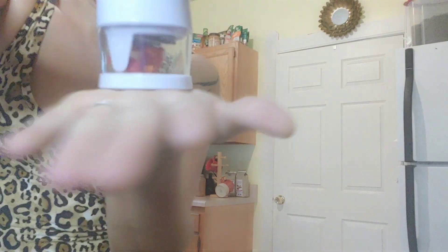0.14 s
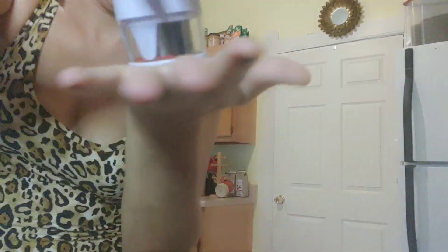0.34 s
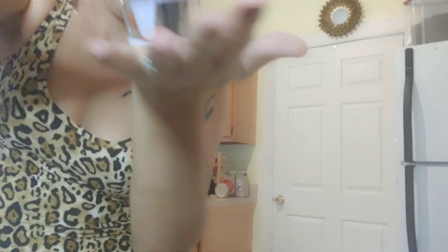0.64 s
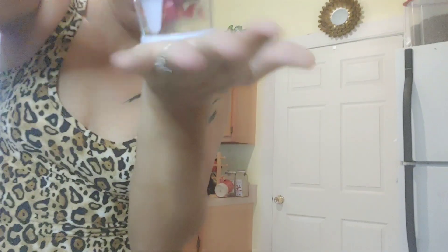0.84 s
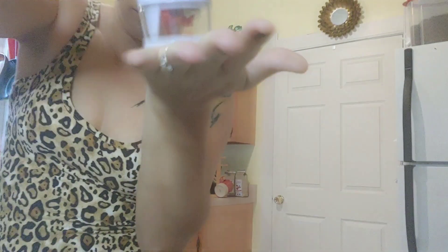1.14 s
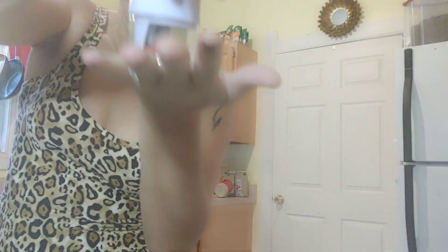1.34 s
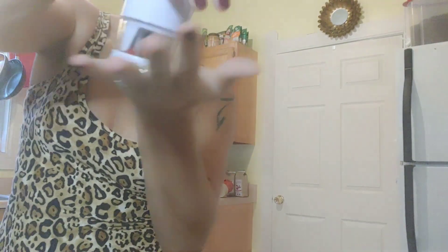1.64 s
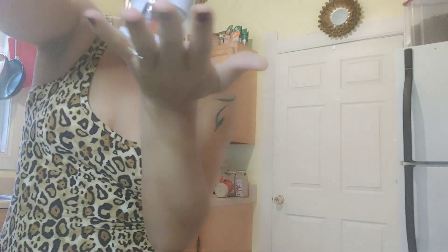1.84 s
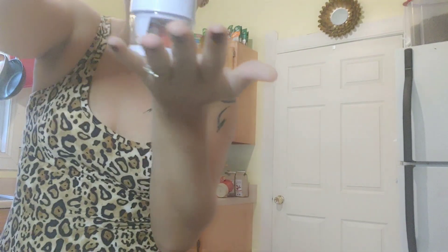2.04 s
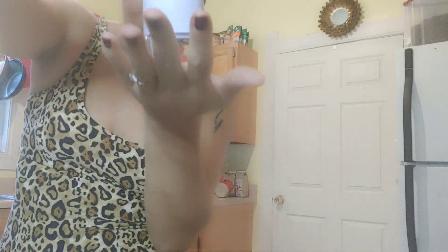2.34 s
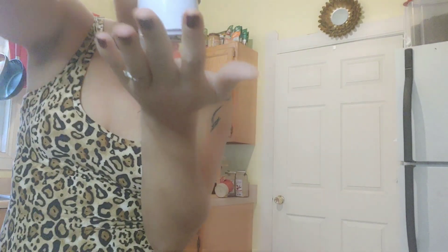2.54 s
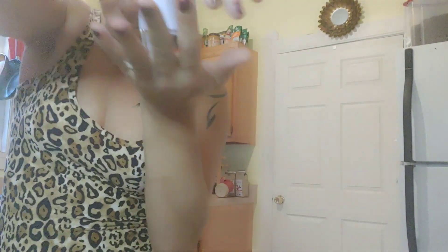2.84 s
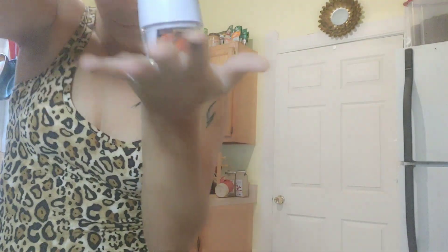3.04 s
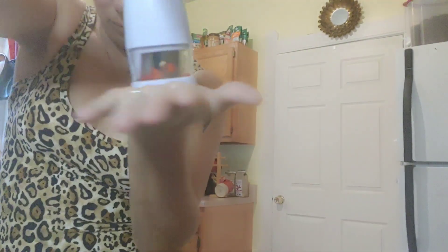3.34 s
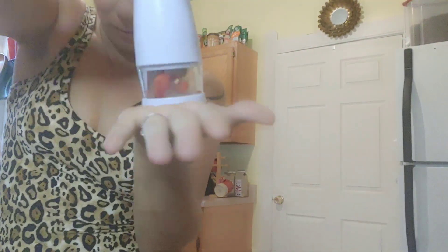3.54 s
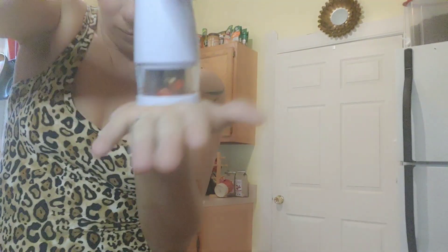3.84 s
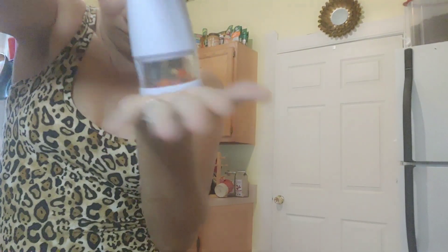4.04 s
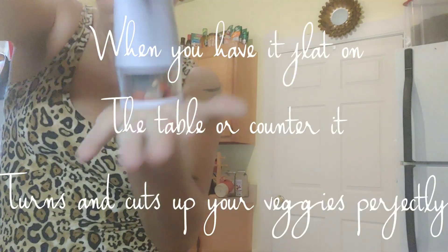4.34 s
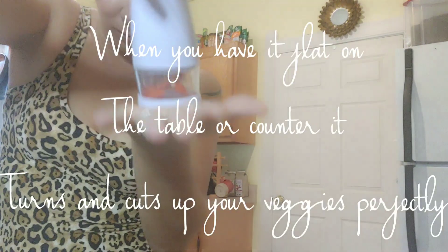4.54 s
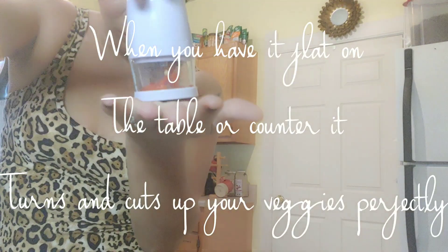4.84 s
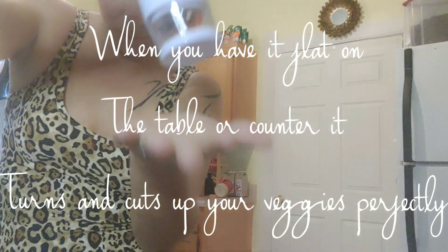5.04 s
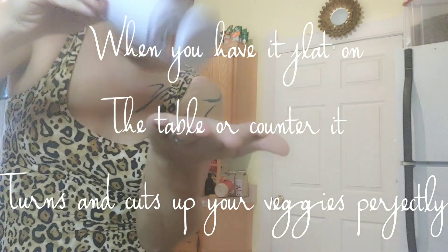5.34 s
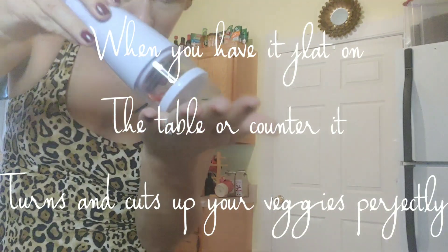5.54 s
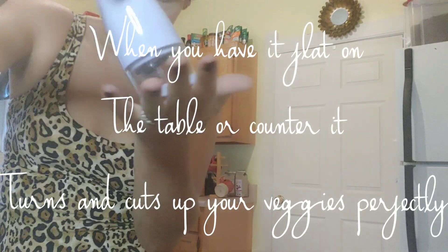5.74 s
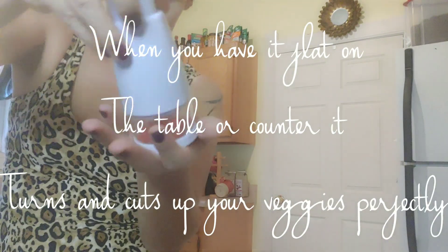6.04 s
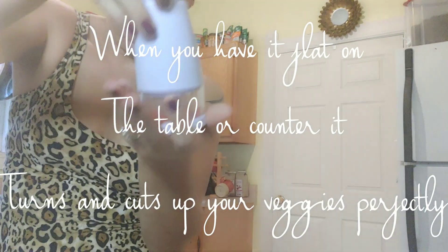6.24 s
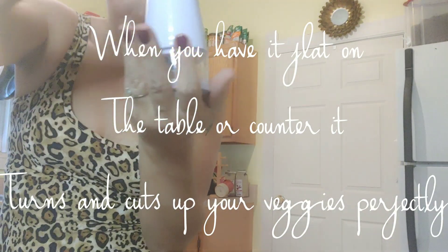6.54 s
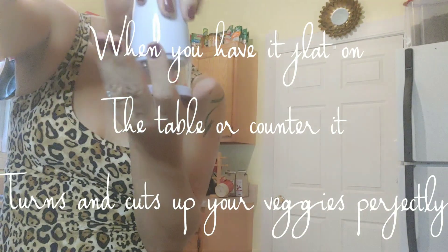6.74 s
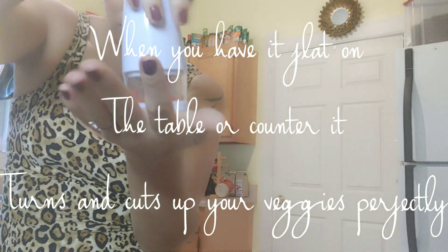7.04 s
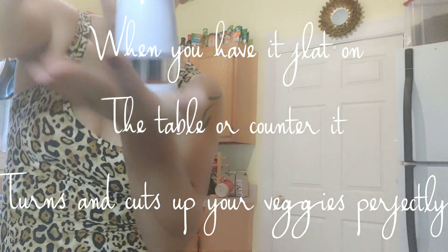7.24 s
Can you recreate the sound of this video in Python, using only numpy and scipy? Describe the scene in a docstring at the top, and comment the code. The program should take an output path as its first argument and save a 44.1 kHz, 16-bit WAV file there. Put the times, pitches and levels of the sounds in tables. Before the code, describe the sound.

Close to a stereo microphone in a lively kitchen, a spring-loaded plastic chopper is pumped on a palm. Each push rasps down with small vegetable crunches and a hollow knock; each return sings briefly and clacks with a bright metallic ping. Six pushes, a short pause, seven quicker ones, then sparse rattles, a soft hollow landing and a final spring-back over low appliance hum.

```python
"""A plastic plunger chopper works on an open palm in a kitchen, close to a stereo microphone.
The spring throws the plunger back onto its stop, then pushes scrape down the barrel and chop into the cup:
six pushes, a pause in which the spring is eased back, seven more. Light plastic rattles follow, the cup
lands on the palm, and the plunger springs back one last time. Throughout, an appliance hums and the room answers.
Contacts and rubbing are shaped noise bursts, rings are resonances, and a noise suppressor turns pauses down."""
import sys
import numpy as np
from scipy import signal
from scipy.fft import rfft, irfft, next_fast_len
from scipy.io import wavfile
from scipy.ndimage import uniform_filter1d, map_coordinates

SR = 44100
rng = np.random.default_rng(int(sys.argv[2]) if len(sys.argv) > 2 else 0)


def to_wav(s):
    """Save 16-bit WAV."""
    ch = np.atleast_2d(s).T  # columns
    pcm = np.round(np.clip(ch, -1, 1) * 32767)  # PCM
    wavfile.write(sys.argv[1], SR, pcm.astype(np.int16))


N = 325458
T = np.arange(-SR // 8, SR // 4) / SR  # time around one contact [s]
LEAD = SR // 4  # samples of action before time zero

# colour of the plunger rubbing in the barrel: (frequency [Hz], level [dB])
BARREL_COLOUR = [(100, -35), (300, -14), (700, -6), (1200, -5.5), (1600, -6), (2200, 3), (2700, -9.5),
                 (4400, -2.5), (5900, -9.5), (7100, -3.5), (8600, -18), (11600, -14.5), (13000, -24.5),
                 (15500, -41)]
# bright colour of hard plastic clacking: (frequency [Hz], level [dB])
CLACK_COLOUR = [(500, -21), (1400, -0.5), (2000, -3.5), (3000, -7.5), (4500, 0), (6000, -2), (7500, -1),
                (8800, -10.5), (12000, -10.5), (15500, -34.5)]
# dull colour of a jolt or rattle: (frequency [Hz], level [dB])
THUD_COLOUR = [(80, -19), (300, -4.5), (650, -7), (1000, -0.5), (1600, -4), (2500, -4.5), (6000, -29.5),
               (14000, -50)]


def amp(db):
    """Decibels to gain."""
    return 10 ** (np.asarray(db) / 20)


def unit(x):
    """Scale to rms 1."""
    return x / np.sqrt(np.mean(x ** 2) + 1e-20)


def blow(x, db):
    """Give a short sound the energy of 10 ms at this rms level."""
    energy = np.mean(np.sum(x ** 2, axis=-1))
    return x * amp(db) * np.sqrt(.01 * SR / (energy + 1e-20))


def along(points, hz):
    """Read (frequency [Hz], value) points on a log frequency axis."""
    f, v = np.transpose(points)
    return np.interp(np.log(hz + 1), np.log(f), v)


def filtered(x, response):
    """Apply a complex response of frequency, with padding against wrap-around."""
    m = 2 * next_fast_len(x.shape[-1] // 2 + 2048)
    spectrum = rfft(x, m) * response(np.fft.rfftfreq(m, 1 / SR))
    return irfft(spectrum, m)[..., :x.shape[-1]]


def coloured(x, points):
    """Causal filter with the given (frequency [Hz], level [dB]) shape; minimum phase by cepstrum."""
    def response(hz):
        cepstrum = irfft(np.log(amp(along(points, hz))))
        cepstrum[1:len(hz) - 1] *= 2
        cepstrum[len(hz):] = 0
        return np.exp(rfft(cepstrum))
    return filtered(x, response)


def ring(x, hz, width_hz, order=1):
    """One resonance; order 2 has steeper skirts."""
    def response(f):
        damping = 1j * f * width_hz
        return (damping / (hz * hz - f * f + damping)) ** order
    return filtered(x, response)


def wobble(rate, size):
    """A smooth random curve, rate knots a second."""
    knots = rng.standard_normal(size // 8)
    return map_coordinates(knots, [np.arange(size) * min(rate, SR / 10) / SR], mode="mirror")


def grit(alike, rough_db):
    """Dense uneven micro-contacts, partly shared by both channels."""
    shared, *own = rng.standard_normal((3, len(T)))
    share = np.clip(alike, 0, 1)
    noise = np.sqrt(share) * shared + np.sqrt(1 - share) * np.array(own)
    return unit(noise * amp(rough_db * wobble(900, len(T))))


def strike(shell_db, t60, alike):
    """One contact: a click, about a millisecond of crushing, and the dense, short ring of the plastic shell."""
    after = np.maximum(T, 0)
    crush = grit(alike=0.77, rough_db=1) * (T > 0) * np.exp(-after / 0.00058)
    shell = grit(alike, rough_db=1.0) * (T > 0) * amp(-60 * after / t60)
    return blow(1. * (T == 0), 0) + blow(crush, -3.5) + blow(shell, shell_db)


def chatter(spread):
    """A burst of tiny bounces lasting a few times spread [s], rising faster than it dies."""
    bounces = grit(alike=0.39, rough_db=1.5)
    reach = abs(spread) * np.where(T < 0, .9, 1.9) + 1e-5
    return bounces * np.exp(-(np.abs(T) / reach) ** 0.92)


def travel(seconds, growth_db):
    """Rubbing strength: gentle start 1.6 * seconds before contact, gathering pace, then a few ms of decay."""
    done = np.clip(1 + T / (1.6 * max(seconds, .003)), 0, 1)
    start = np.sin(np.pi / 2 * np.minimum(done / 0.72, 1)) ** 2
    return start * amp(growth_db * (done - 0.76)) * np.exp(-np.maximum(T, 0) / 0.0059)


def glide(from_hz, to_hz, seconds, width_hz):
    """Narrow friction noise whose resonance slides as the plunger moves."""
    done = np.clip(1 + T / max(seconds, .003), 0, 1)
    phase = 2 * np.pi * np.cumsum(from_hz + (to_hz - from_hz) * done) / SR

    def slow():
        return filtered(grit(alike=0.52, rough_db=0), lambda hz: 1 / (1 + (2 * hz / width_hz) ** 2))
    return unit(slow() * np.cos(phase) + slow() * np.sin(phase))


def add(track, s, sound):
    """Mix a sound into the track with its contact at time s [s]."""
    at = LEAD + round(s * SR) + np.round(T * SR).astype(int)
    inside = (at >= 0) & (at < track.shape[1])
    track[:, at[inside]] += sound[:, inside]


def down_strokes():
    """The hand takes up the play, the plunger rasps down, the blade hits the cup floor and the cup rings hollow."""
    # pushes: (chop time [s], push length [s], scrape level [dB], knock setting [dB], crack level [dB],
    #          cup ring setting [dB])
    pushes = [(.151, .055, -30.5, -23.5, -24, -46.5), (.4825, .047, -27.5, -18.5, -16.5, -35),
              (0.8195, .055, -31, -20, -22, -36.5), (1.1516, .043, -30.5, -21, -17.5, -40),
              (1.4721, .044, -29.5, -18, -23, -44.5), (1.7991, .046, -31.5, -23.5, -25.5, -42),
              (3.02, 0.041, -31, -22, -26, -44), (3.28, .055, -31.5, -20, -27, -35.5),
              (3.5424, .056, -30, -29, -29.5, -44), (3.767, .046, -27.5, -25, -24.5, -38),
              (3.994, .056, -29.5, -24, -30, -50), (4.2265, .038, -30.5, -22.5, -20.5, -50),
              (4.4974, .052, -31.5, -23.5, -25, -42)]
    # dull colour of the blow on the cup floor: (frequency [Hz], level [dB])
    knock_colour = [(60, -24.5), (150, -12.5), (380, -3.5), (600, -5.5), (1030, -4), (1500, -5),
                    (2000, -11.5), (3000, -12), (6000, -40.5), (14000, -55)]
    # bright colour of the same blow: (frequency [Hz], level [dB])
    crack_colour = [(1000, -22), (2500, 0.5), (4500, -0.5), (6200, -3), (7050, -2), (8400, -17),
                    (11800, -21.5), (13500, -36), (16000, -50)]
    track = np.zeros((2, LEAD + N))
    for s, length, scrape_db, knock_db, crack_db, cup_db in pushes:
        seconds = .78 * length
        slack = blow(ring(chatter(.0015), 1400, width_hz=2200, order=2), -43)
        add(track, s - length, slack)
        rub = unit(coloured(grit(alike=0.66, rough_db=3.5), BARREL_COLOUR)) * travel(seconds, growth_db=10.5)
        # the rasp peaks halfway through the push, gliding up towards the spring's own note
        push = np.sin(np.pi * np.clip(1 + T / length, 0, 1))
        low_rasp = glide(1350, 2050, seconds, width_hz=330)
        rasp = (low_rasp + 0.44 * glide(2050, 2300, seconds, width_hz=170)) * push
        hit = strike(shell_db=-1.0, t60=.032, alike=.8)
        # the blow bends the cup wall, which gives the knock its pitch
        knock = blow(coloured(hit, knock_colour), knock_db - 2.5)
        knock = knock + blow(ring(hit, 1000, width_hz=480, order=2), knock_db - 9)
        crack = blow(coloured(strike(shell_db=8, t60=.013, alike=0.46), crack_colour), crack_db)
        palm = blow(ring(chatter(.02), 170, width_hz=260, order=2), -41)  # the palm takes the blow
        # hollow note near 660 Hz, drawn slightly differently for each push
        cup_hz = 660 * (1 + .015 * rng.standard_normal())
        cup = blow(ring(1. * (T == 0), cup_hz, width_hz=16), cup_db + 3.0)
        scraping = amp(scrape_db) * rub + amp(-37.5) * rasp
        add(track, s, scraping + knock + crack + cup + palm + crunch(length))
    return track


def crunch(length):
    """Bits of vegetable snap unevenly under the advancing blade, harder as it presses harder."""
    snaps_per_s = 160
    pressure = np.clip(1 + T / length, 0, 1) * (T < 0)
    snaps = (rng.random(len(T)) < snaps_per_s / SR) * pressure * rng.uniform(-1, 1, len(T))
    snap = filtered(strike(shell_db=0, t60=.01, alike=.7), lambda hz: 1 / (1 + (hz / 5000) ** 4))
    snap = coloured(snap, CLACK_COLOUR)[:, T > -.001]
    return signal.fftconvolve(snaps[None], blow(snap, -33), axes=1)[:, :len(T)]


def up_strokes():
    """The spring sings as it extends; the plunger chatters on its stop, pings the steel and jolts the barrel."""
    # returns: (time at the stop [s], flight setting [s], ping level [dB], ping [Hz], spring level [dB],
    #           spring note [Hz], delay of the barrel's jolt [s], jolt level [dB])
    returns = [(-.06, .026, -25.5, 7500, -29, 2250, .003, -38),
               (.2445, .032, -25.5, 6860, -23.5, 2219, .0055, -24.5),
               (.5892, .026, -20.5, 7220, -19.5, 2001, 0.0077, -22.5),
               (.9465, .031, -25, 7130, -21, 2220, 0.00052, -20.5),
               (1.2585, .026, -25.5, 7470, -21, 2130, 0.0036, -28),
               (1.5735, .027, -24, 7540, -23, 2117, .0035, -25),
               (2.816, .026, -28, 7040, -29.5, 2030, .001, -24.5),
               (3.1095, .015, -17.5, 7150, -23.5, 2090, .0044, -28.5),
               (3.3672, .026, -16, 6910, -23, 2073, .002, -27),
               (3.6033, .02, -40, 7210, -19.5, 1963, .0055, -26),
               (3.8456, .034, -19.5, 7300, -26, 1927, .001, -34),
               (4.068, .04, -20, 6980, -20.5, 2015, .002, -27),
               (4.2923, .027, -23, 7710, -32, 2076, .0007, -24),
               (4.517, .014, -24, 6970, -42, 2205, .002, -30),
               (7.2605, .026, -22.5, 7040, -33, 2280, .004, -34)]
    bounce_s = .0021  # spread of the bouncing on the stop
    usual_ping_db = -22  # an ordinary hit on the stop
    clack_grows, steel_grows = 0.18, .35  # dB for each dB of extra ping
    pan_db = -1.06  # left minus right
    track = np.zeros((2, LEAD + N))
    for s, seconds, ping_db, ping_hz, spring_db, spring_hz, delay, jolt_db in returns:
        extra_db = ping_db - usual_ping_db
        rub = unit(coloured(grit(alike=0.56, rough_db=3.5), BARREL_COLOUR)) * travel(seconds, growth_db=7.5)
        # one clear note among the rubbing, and a weaker one sliding below it
        coil = glide(1.07 * spring_hz, spring_hz, seconds, width_hz=270)
        low_coil = glide(spring_hz, .95 * spring_hz, seconds, width_hz=330)
        spring = (coil + 0.62 * low_coil) * travel(seconds, growth_db=17)
        clack = blow(coloured(chatter(bounce_s), CLACK_COLOUR), -20 + clack_grows * extra_db)
        ping = blow(ring(chatter(bounce_s), ping_hz, width_hz=600, order=2), ping_db)
        # lower and higher rings of the steel blade shaft
        steel_db = steel_grows * extra_db
        low_ping = blow(ring(chatter(bounce_s), 4400, width_hz=700, order=2), -33.5 + steel_db)
        high_ping = blow(ring(chatter(bounce_s), 11900, width_hz=500), -31 + steel_db)
        stroke = amp(-29) * rub + blow(spring, spring_db) + clack + low_ping + ping + high_ping
        add(track, s, stroke * amp([[pan_db / 2], [-pan_db / 2]]))
        jolt = coloured(strike(shell_db=-0.5, t60=0.029, alike=0.55), THUD_COLOUR)
        add(track, s + delay, blow(jolt, jolt_db))
    return track


def handling():
    """Light plastic rattles and ticks, dull pats of the cup on the palm, and the spring easing back."""
    # light plastic rattles, the play being taken up, the plunger's release and a rub on the palm:
    # (time [s], bright level [dB], chatter spread [s])
    rattles = [(.435, -42, .0008), (2.773, -54, .002), (5.236, -53, .005), (5.245, -40.5, .0013),
               (5.254, -44, .002), (5.419, -57.5, .003), (5.444, -43, .001), (5.456, -39.5, .005),
               (6.655, -55, .006), (6.691, -55.5, .005)]
    # nails and fingers tick on the shell: (time [s], level [dB], ring [Hz], chatter spread [s])
    ticks = [(2.312, -50, 2550, .0013), (2.344, -57, 2750, .003), (5.177, -63, 3430, .0005),
             (5.851, -58, 4050, .0005), (6.956, -55, 3900, .0024), (6.966, -53.5, 2030, .003)]
    # the cup lands on the palm and rocks: (time [s], level setting [dB], contact spread [s])
    landing = [(6.4456, -30, .00045), (6.471, -34.5, .0004), (6.476, -35, .0006)]
    # resonances of the cup closed by the palm: (frequency [Hz], width [Hz], relative level [dB])
    cup_modes = [(270, 34, -4), (590, 48, 4), (1240, 96, -10), (1620, 43, -11), (2030, 35, -12),
                 (2970, 60, -22)]
    track = np.zeros((2, LEAD + N))
    for s, db, spread in rattles:
        bright = blow(coloured(chatter(spread), CLACK_COLOUR), db)
        dull = blow(coloured(chatter(spread), THUD_COLOUR), db + 4)
        add(track, s, bright + dull)
    for s, db, hz, spread in ticks:
        add(track, s, blow(ring(chatter(spread), hz, width_hz=1000, order=2), db))

    def soft(spread):  # flesh softens the contact
        return filtered(chatter(spread), lambda hz: 1 / (1 + 1j * hz / 1900) ** 3)
    for s, db, spread in landing:
        touch = soft(spread)
        hollow = sum(amp(level) * ring(touch, hz, width) for hz, width, level in cup_modes)
        pat = blow(ring(touch, 1400, width_hz=1100, order=2), db - 5.5)
        add(track, s, blow(hollow, db - 0.5) + pat)
    # the rim squeaks into place
    slide = soft(.009)
    squeak = blow(ring(slide, 1880, width_hz=700, order=2), -36)
    add(track, 6.501, squeak + blow(ring(slide, 760, width_hz=460, order=2), -40))
    # the spring sings faintly while the plunger is eased back
    ease_from_s, ease_length_s = 2.037, .31
    swell = np.sin(np.pi * np.clip((np.arange(N) / SR - ease_from_s) / ease_length_s, 0, 1))
    singing = unit(ring(rng.standard_normal((2, N)), 2097, width_hz=870, order=2))
    track[:, LEAD:] += amp(-57) * swell * singing
    return track


def kitchen(x, early_db, late_db, early_t60):
    """Near surfaces answer at once, the room slowly; fresh noise echoes are drawn every third of a second."""
    # decay of the room: (frequency [Hz], t60 [s])
    room_decay = [(150, 0.97), (700, 0.49), (2000, 0.52), (7000, .47), (14000, 0.36)]
    # strength of the answer: (frequency [Hz], level [dB])
    wall_colour = [(150, -9.5), (600, 1.5), (1100, -4), (2000, -1), (7000, -2), (13000, -0.5)]
    hop = SR // 3
    out = np.zeros((2, x.shape[1] + SR))
    for start in range(0, x.shape[1], hop):
        hz, t, z = signal.stft(rng.standard_normal((2, SR // 2)), SR, nperseg=256)
        decay = amp(-60 * t / along(room_decay, hz)[:, None])
        late = signal.istft(z * decay, SR, nperseg=256)[1]
        age = np.arange(late.shape[1]) / SR
        # cubed noise makes a few echoes stand out
        early = rng.standard_normal(late.shape) ** 3 * amp(-60 * age / early_t60)
        arrival = np.clip((age - .003) / 0.006, 0, 1)
        echoes = amp(early_db) * unit(early * arrival) + amp(late_db) * unit(late * arrival)
        echoes = echoes / np.sqrt(len(age))
        wet = signal.fftconvolve(x[:, start:start + hop], echoes, axes=1)
        out[:, start:start + wet.shape[1]] += wet
    return coloured(out[:, :x.shape[1]], wall_colour)


def ambience():
    """Low room noise, wider in the treble, and an appliance hum of sines unsteady in level and phase."""
    # appliance lines: (frequency [Hz], relative level [dB])
    appliance_lines = [(43.1, -54), (118.4, -61), (226.1, -58), (274.5, -59.5), (414.5, -68)]
    # colour of the room noise: (frequency [Hz], relative density [dB per Hz])
    air_colour = [(20, -36), (32, -15.5), (50, 0), (60, -0.5), (92, -15), (125, -8.5), (160, -13.5),
                  (200, -9), (290, -10), (420, -17), (620, -23.5), (1000, -26), (2300, -33), (4300, -38.5),
                  (6000, -45.5), (7400, -39), (9000, -57.5), (12000, -54), (15500, -66.5)]
    # left-right likeness of the room noise: (frequency [Hz], likeness [0-1])
    air_alike = [(50, 1), (250, 0.91), (700, 0.47), (2000, 0.069)]
    t = np.arange(N) / SR

    def mid_side(hz):
        turn = np.arccos(np.clip(along(air_alike, hz), -1, 1)) / 2
        return amp(along(air_colour, hz)) * [np.cos(turn), np.sin(turn)]
    mid, side = filtered(rng.standard_normal((2, N)), mid_side)
    air = unit(np.array([mid + side, mid - side]))
    hum = np.zeros(N)
    for hz, db in appliance_lines:
        level = amp(db + 1.5 * wobble(5.5, N))
        hum += level * np.sin(2 * np.pi * hz * t + .6 * wobble(7, N))
    return amp(-47.5) * air + amp(-51) * unit(hum)


def suppressor(x):
    """Treble opens the noise suppressor, for longer the louder it is; in the pauses everything is turned down."""
    wake_db = -61.5  # treble level that opens it
    hold_s_per_db, longest_hold_s = .035, .71  # how long it stays open
    suppress_db, closing_s = -10, 0.018
    t = np.arange(N) / SR
    treble = filtered(x, lambda hz: hz > 5500)
    power = np.abs(uniform_filter1d(np.mean(treble ** 2, axis=0), size=512))
    level_db = 10 * np.log10(power + 1e-20)
    hold = np.minimum(hold_s_per_db * (level_db - wake_db), longest_hold_s)
    open_until = np.maximum.accumulate(t + hold)
    shut = np.clip((t - open_until) / closing_s, 0, 1)
    return x * amp(suppress_db * uniform_filter1d(shut, size=768))


def scene():
    """The chopper is a little nearer the left microphone; its room echoes and the ambience join it."""
    chopper = down_strokes() + up_strokes() + handling()
    ahead = 8e-5  # seconds by which the left side hears it first
    sides = np.array([[1], [-1]])
    direct = filtered(chopper, lambda hz: np.exp(1j * np.pi * hz * ahead * sides))
    heard = direct + kitchen(chopper, early_db=-8.5, late_db=-4.5, early_t60=.11)
    return heard[:, LEAD:] + ambience()


def record(dry):
    """Microphone ports colour each side; pauses are turned down, peaks rounded off, the band limited."""
    # difference between the two ports: (frequency [Hz], left minus right [dB])
    port_difference = [(100, 1.5), (330, .5), (700, 4), (1400, -2), (6800, -1.5), (8600, 1.5), (14000, 7)]
    halves = np.array([[.5], [-.5]])
    ports = filtered(dry, lambda hz: amp(along(port_difference, hz) * halves))
    steady = suppressor(ports)
    rounded = steady / (1 + (steady / .9) ** 6) ** (1 / 6)
    return filtered(rounded, lambda hz: hz < 15900)


dry = scene()
out = record(dry)
to_wav(out)
```